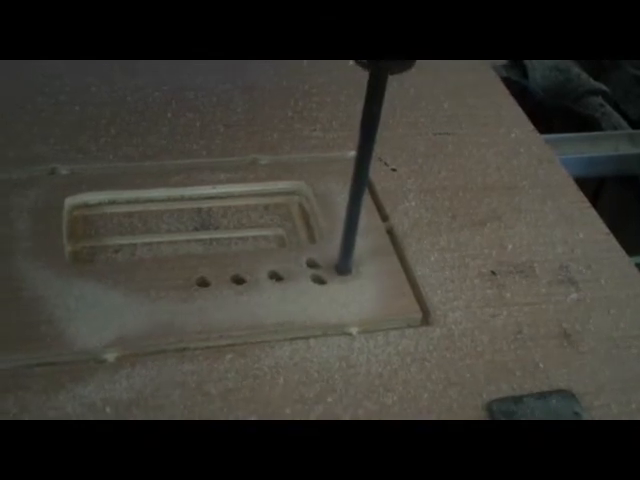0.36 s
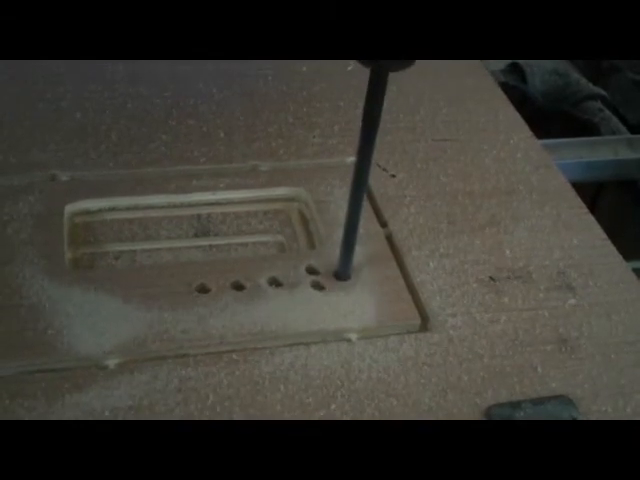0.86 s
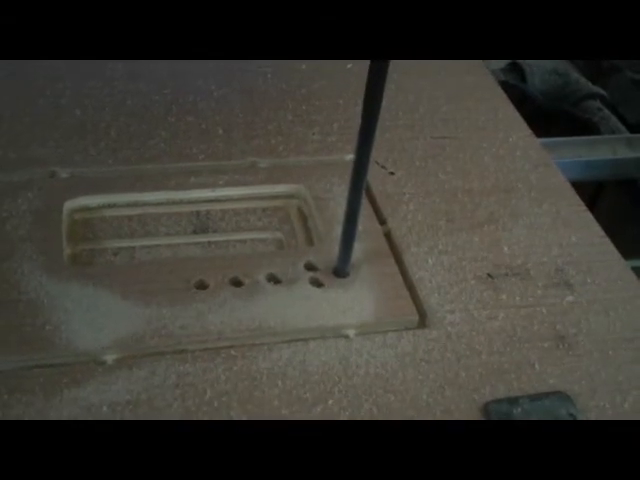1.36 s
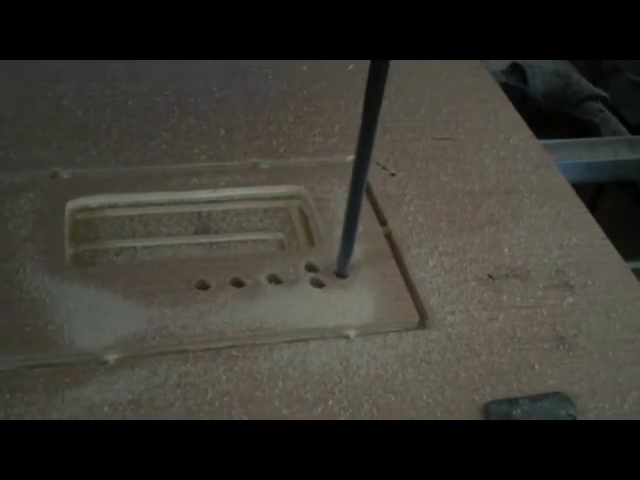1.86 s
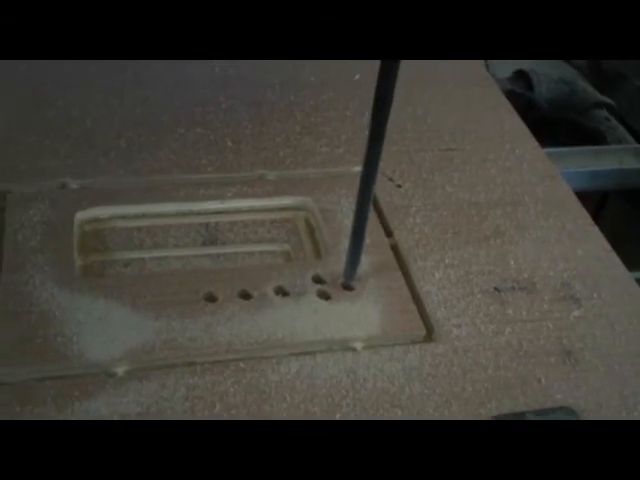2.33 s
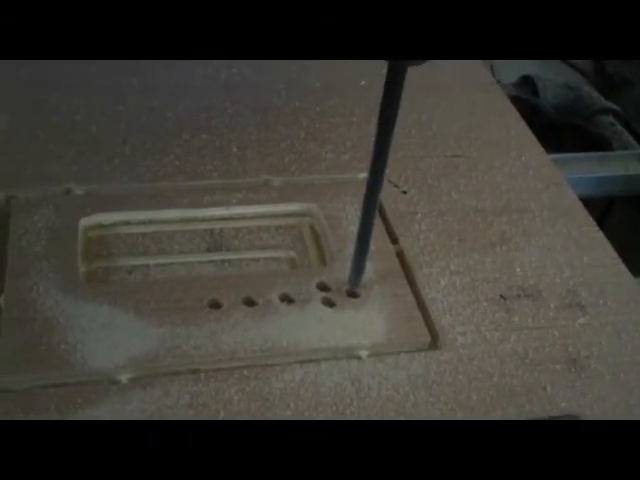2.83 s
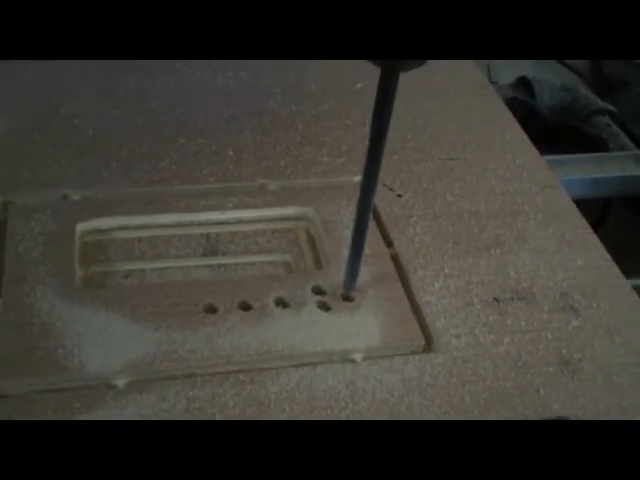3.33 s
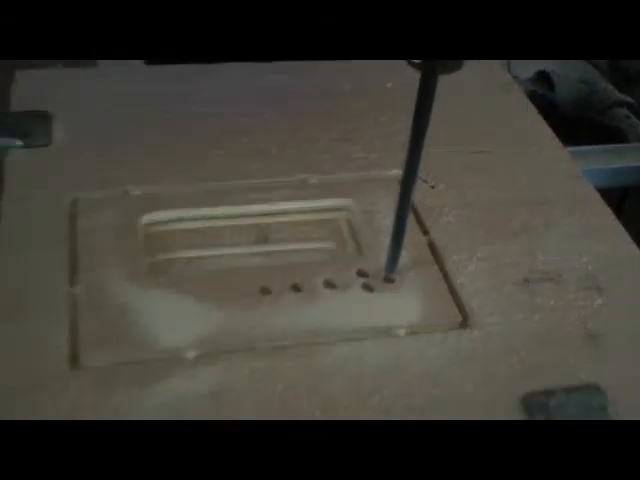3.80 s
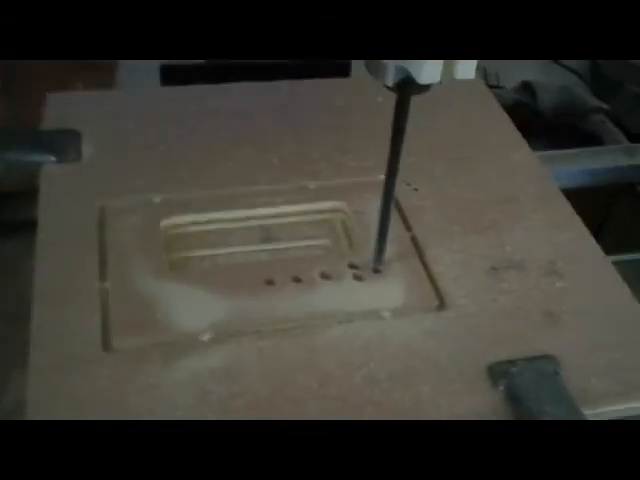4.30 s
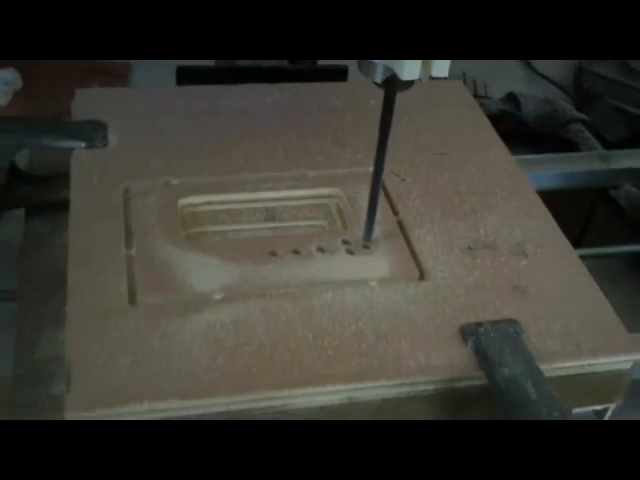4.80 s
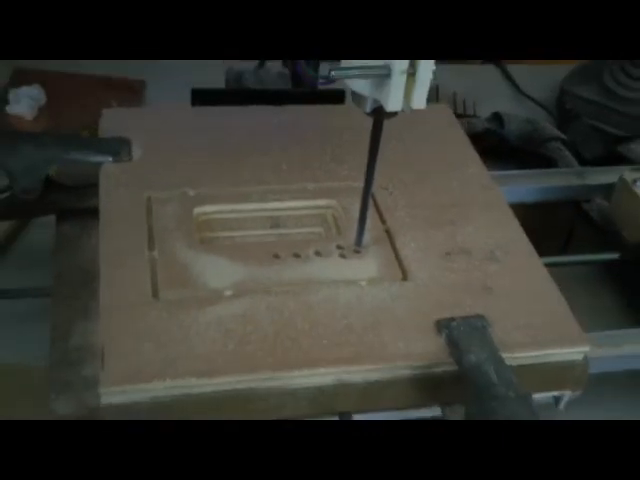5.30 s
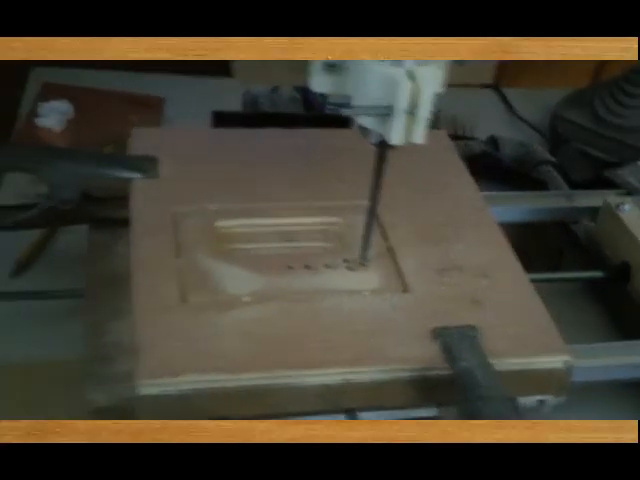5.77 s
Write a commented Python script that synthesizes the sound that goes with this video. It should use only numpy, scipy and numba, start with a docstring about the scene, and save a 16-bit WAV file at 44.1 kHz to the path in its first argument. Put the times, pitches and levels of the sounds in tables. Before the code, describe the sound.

From the start a high-speed milling bit grinds in fibreboard: a harsh, dense buzz around a 225 Hz rotation, with bright tearing chip hiss, a rapid flutter of about sixteen wobbles a second and thumping low frame rumble. It thickens and intensifies until about 0.63 s, when the bit breaks free with a very short woody ring. The level drops to a free-running spindle, airy fan rush with hum and a thin whine near 3 kHz, rising slightly as speed recovers. Small dry metallic knocks patter from 0.73 to 1.08 s over a rough carriage drive buzz, stronger from 1.0, ending at 1.28. From 1.38 to 1.95 s a faint motor tone slides down. The whir slowly comes up in level; around 1.75 s it gains a rougher half-speed buzz. Near 3.8 s the whine swells briefly, and around 4 s the microphone backs away, making it thinner and slightly hollow. It runs steadily to an abrupt silence at 5.58 s.

```python
"""A high-speed bit grinds the end of a plunge into fibreboard, lifts clear and runs free in a workshop.
Cut: partials locked to a wobbling shaft rate, chip noise pulsed by two edges, board modes rung at exit.
Spindle: half-rate whirl partials, bearing whine, fan noise and housing resonances; the microphone backs away.
Carriage: noise bands, damped knocks and a falling motor tone; frame rumble lies under the cut.
Automatic gain ducks under the cut and climbs back slowly; the sound stops abruptly."""
import sys
import numpy as np
from scipy import signal
from scipy.fft import rfft, irfft, next_fast_len
from scipy.io import wavfile
from scipy.ndimage import uniform_filter1d
from numba import njit

SR = 44100
rng = np.random.default_rng(int(sys.argv[2]) if len(sys.argv) > 2 else 0)


def generate_wav(signal):
    """Clip the signal to [-1, 1] and save it as 16-bit WAV at the path in sys.argv[1]."""
    frames = np.transpose(np.atleast_2d(signal))
    scaled = np.clip(frames, -1, 1) * 32767
    pcm = np.round(scaled).astype(np.int16)
    wavfile.write(sys.argv[1], SR, pcm)


def convert_level_to_amplitude(level_db):
    """Map a level in decibels to its linear amplitude factor."""
    exponent = np.asarray(level_db, float) / 20
    return 10 ** exponent


N = 260366
T = np.arange(N) / SR

# All table levels are relative: later gains apply.
# buried-cut partials, shaft-rate multiples from 4 up: [level/dB]
CUT_PARTIALS = [-15, -41.5, -26.5, -39.5, -34.5, -38.5, -35.5, -42, -37.5, -35, -25.5, -42.5, -26, -35.5,
                -32.5, -34, -50.5, -38, -39, -38, -35.5, -37, -30, -41, -30, -37, -32, -38, -39, -49.5, -36]
# shallow-cut colour relative to buried: [f/Hz, level/dB]
SHALLOW_COLOUR = [(900, -2), (1360, 4.5), (2300, 5), (2750, -4), (3650, -8.5), (4100, 1), (5200, 0.5),
                  (5900, -4), (6400, -2.5), (7000, 4.5), (7700, -8)]
# chip noise spectrum: [f/Hz, level/dB]
CHIP_SPECTRUM = [(240, -69.5), (600, -22.5), (900, -22), (1400, -16.5), (2200, -23.5), (3500, -14),
                 (6500, -16.5), (8200, -29), (13000, -40)]
# board modes rung as the bit breaks free: [f/Hz, level/dB, t60/s]
BOARD_MODES = [(856, -12.5, 0.066), (1200, -13.5, 0.054), (3200, -19.5, 0.055), (1698, -24.5, 0.029)]
# multiples of half the shaft rate heard from the spindle: [multiple]
HALF_RATE_MULTIPLES = [*range(1, 12), 23, 24, 25]
# their levels: [near level/dB, far level/dB, share of whirl level]
SPINDLE_PARTIALS = [(-30.5, -30, 0.12), (-14, -14.5, 0.25), (-24, -28.5, 1), (-20.5, -20, -0.32),
                    (-20, -24.5, 0.98), (-8, -9.5, 0.14), (-6, -16.5, .9), (-11.5, -9.5, 0.91),
                    (1, -0.5, 0.84), (-2, -1, 0.11), (-22.5, -24.5, 0.17), (-22.5, -13, 1),
                    (-30.5, -7, 0.088), (-29.5, -14, 0.65)]
# bearing whine, multiples 1 to 3: [near level/dB, far level/dB, share of whirl level]
WHINE_PARTIALS = [(-8.5, -11.5, 0.11), (-6, -6, -0.008), (-13.5, -20.5, 0.38)]
# fan noise spectrum: [f/Hz, level/dB]
FAN_SPECTRUM = [(20, -60), (50, -44.5), (100, -32), (190, -33), (310, -29.5), (520, -19.5), (760, -12.5),
                (1100, -7), (1500, -7.5), (2100, -13.5), (3500, -18), (5650, -16), (6400, -14), (7300, -13),
                (8200, -23.5), (12500, -24)]
# housing resonances: [f/Hz, width/Hz, near level/dB, far level/dB]
HOUSING_MODES = [(831.3, 21, -8.5, -10.5), (1070, 34, -3, -12.5), (1301, 25, -11, -17), (1633, 71, -3.5, 3),
                 (1845, 170, -3, -16), (2274, 118, -7, -14), (2966, 450, -5.5, -15),
                 (4470, 1650, -0.5, -0.5), (7143, 370, -2, -12.5), (8580, 40, -27, -29.5),
                 (11770, 900, -18, -19.5)]
# knocks as the carriage lifts: [t/s, level/dB]
KNOCKS = [(0.7307, -30), (0.745, -21), (0.8047, -25), (0.819, -23), (0.8805, -21.5), (0.8928, -22),
          (0.9617, -22.5), (0.971, -24), (1.0495, -29), (1.0774, -27)]
# metal modes of each knock: [f/Hz, level/dB, t60/s]
KNOCK_MODES = [(3850, -5, .007), (4440, -3, .007), (4990, -2.5, .006), (5660, -6, .006),
               (6400, -3.5, 0.0055), (7030, -1.5, 0.0063), (8700, -9.5, .005), (1110, -7.5, 0.0201)]
# carriage drive bands: [f/Hz, width/Hz, level/dB]
DRIVE_BANDS = [(3075, 60, 2), (940, 25, -6), (1180, 30, -6)]
# frame noise spectrum: [f/Hz, level/dB]
FRAME_SPECTRUM = [(25, -27), (60, -20), (150, -11.5), (230, 1.5), (330, -8), (480, -8), (800, -40)]
# overall response, narrow gaps near 7.9 and 11 kHz, little above 12.5 kHz: [f/Hz, level/dB]
OVERALL_RESPONSE = [(20, -3.5), (7450, 1), (7720, -4.5), (7800, -36), (7960, -38.5), (8040, -7.5),
                    (8300, 1.5), (10500, 1.5), (10900, -3.5), (11000, -19), (11100, -11.5), (11400, -0.5),
                    (12450, 1), (12750, -51.5), (13500, -74)]

# bit in the board: shaft sags, faster just before exit; wobble and load grow with depth
LEAVE_S, LEAVE_T60_S = 0.6264, 0.014
CUT_HZ, SAG_HZ_PER_S, STALL_S, STALL_HZ_PER_S = 227.8, 4.9, 0.585, 85
WOBBLE_RATE_HZ, WOBBLE_PEAK_S = 16.55, 0.276
WOBBLE_START_HZ, WOBBLE_GROWTH_HZ_PER_S = 0.5, 2.1
LOAD_DB_PER_S = 8.5
BURY_S, BURY_SPAN_S = 0.16, 0.021
TOP_MULTIPLES = range(35, 56)  # of the shaft rate
# free spindle: speed recovers, then whirl sets in
FREE_HZ, SLOWED_HZ, RECOVER_S = 241.8, 226.8, 0.75
WHIRL_S, WHIRL_SPAN_S, WHIRL_OFF_DB, WHIRL_ON_DB = 1.75, 0.096, -21.5, 2
BACK_S, BACK_SPAN_S = 3.95, 0.24  # microphone backs away
ECHO_S, ECHO_GAIN = 0.000692, 0.13
# bearing whine: slower recovery, shiver while the carriage travels, brief swell as the microphone moves
WHINE_HZ, WHINE_SLOWED_HZ, WHINE_RECOVER_S = 3107, 2972, 0.9
SHIVER_DEPTH_HZ, SHIVER_RATE_HZ, SHIVER_PEAK_S, SHIVER_END_S = 22, 14.6, 1.455, 1.68
SWELL_S, SWELL_SPAN_S, SWELL_DB = 3.8, 0.25, 3
# carriage drive: steady, louder surge, off
LIFT_DB, SURGE_S, SURGE_DB, LIFT_END_S, LIFT_EDGE_S = -51.5, 1.01, 7, 1.28, 0.0093
# feed motor: even braking, easing into a crawl; FEED_DB holds at half of BRAKE_HZ
BRAKE_S, BRAKE_HZ, BRAKE_HZ_PER_S, CRAWL_HZ, EASE_HZ, HALT_S = 1.38, 1960, 3330, 200, 150, 1.95
FEED_DB, FEED_DB_PER_OCTAVE, FEED_FADE_S = -53, 6, 0.015
STOP_S = 5.5847


def level(x, db):
    """Scale to an rms level."""
    return x * convert_level_to_amplitude(db) / np.sqrt(np.mean(x ** 2))


def colour(x, points):
    """Filter by (f/Hz, level/dB) points on a log-frequency axis."""
    size = next_fast_len(N)
    hz, db = np.transpose(points)
    bins_hz = np.fft.rfftfreq(size, 1 / SR)
    gain = convert_level_to_amplitude(np.interp(np.log(bins_hz + 1), np.log(hz), db))
    return irfft(rfft(x, size) * gain, size)[:N]


def resonance(x, hz, width_hz):
    """Two-pole band-pass."""
    return signal.lfilter(*signal.iirpeak(hz, hz / width_hz, SR), x)


def walk(rate_hz, size=N):
    """Smooth random drift, about rate_hz turns a second, rms 1."""
    knots = rng.standard_normal(int(size / SR * rate_hz) + 3)
    line = np.interp(T[:size] * rate_hz, np.arange(len(knots)), knots)
    return level(uniform_filter1d(line, int(SR / rate_hz / 2)), 0)


def step(s, span_s):
    """Smooth rise from 0 to 1 around a moment."""
    return 0.5 + 0.5 * np.tanh((T - s) / span_s / 2)


def recover(low_hz, top_hz, lag_s):
    """Exponential speed recovery once the bit is free."""
    return top_hz - (top_hz - low_hz) * np.exp(-np.maximum(T - LEAVE_S, 0) / lag_s)


def stack(hz, orders, waver_db, waver_hz, slip_rad):
    """Partials locked to one rotation, each wavering in level and slipping in phase."""
    turn = 2 * np.pi * np.cumsum(hz) / SR
    total = np.zeros(len(hz))
    for k, db in orders:
        gain = convert_level_to_amplitude(db + waver_db * walk(waver_hz, len(hz)))
        slip = slip_rad * walk(waver_hz, len(hz))
        total += gain * np.sin(k * turn + slip + 2 * np.pi * rng.random())
    return total * np.sqrt(2), turn


def rumble():
    """Frame shakes in uneven thumps, harder as the bit goes deeper."""
    noise = level(colour(rng.standard_normal(N), FRAME_SPECTRUM), -65)
    shake_db = 4.5 * walk(25) + 6 * np.minimum(T, LEAVE_S)
    return noise * convert_level_to_amplitude(shake_db) * (1 - step(LEAVE_S, 0.01))


def feed():
    """Axis motor braking: a rough tone whose pitch and level fall with speed."""
    braking_hz = BRAKE_HZ - CRAWL_HZ - BRAKE_HZ_PER_S * (T - BRAKE_S)
    hz = CRAWL_HZ + EASE_HZ * np.logaddexp(0, braking_hz / EASE_HZ)
    heard = step(BRAKE_S, FEED_FADE_S) - step(HALT_S, FEED_FADE_S)
    db = FEED_DB + FEED_DB_PER_OCTAVE * np.log2(hz / BRAKE_HZ * 2)
    return heard * stack(hz, [(1, db)], waver_db=3.5, waver_hz=35, slip_rad=0.6)[0]


def lift():
    """Carriage drive sings in narrow, rough noise bands."""
    running = step(LEAVE_S, LIFT_EDGE_S) - step(LIFT_END_S, LIFT_EDGE_S)
    bands = sum(level(resonance(rng.standard_normal(N), f, width), db) for f, width, db in DRIVE_BANDS)
    return running * convert_level_to_amplitude(LIFT_DB + SURGE_DB * step(SURGE_S, LIFT_EDGE_S)) * bands


def rattles():
    """Short knocks ring damped metal modes, detuned anew each time."""
    out, t = np.zeros(N), T[:SR // 25]
    for s, db in KNOCKS:
        ring = np.zeros(len(t))
        for f, mode_db, t60 in KNOCK_MODES:
            mode_hz = f * (1 + 0.11 * (rng.random() - 0.5))
            phase = 2 * np.pi * rng.random()
            ring += convert_level_to_amplitude(mode_db - 60 * t / t60) * np.sin(2 * np.pi * mode_hz * t + phase)
        start = int(s * SR)
        attack = np.minimum(t / 0.001, 1)
        out[start:start + len(t)] += convert_level_to_amplitude(db) * attack * ring / np.abs(ring).max()
    return colour(out, [(300, -42), (900, 9.0)])


def balance(multiples, partials, far):
    """Partial levels shifting with distance and with the onset of whirl."""
    whirl_db = WHIRL_OFF_DB + (WHIRL_ON_DB - WHIRL_OFF_DB) * step(WHIRL_S, WHIRL_SPAN_S)
    return [(k, near + far * (away - near) + share * whirl_db)
            for k, (near, away, share) in zip(multiples, partials)]


def fan(hz, far):
    """Turbulent fan air and the housing resonances it excites share the same gusts."""
    gust_db = 0.68 * walk(24.016)
    air = level(colour(rng.standard_normal(N), FAN_SPECTRUM), 6.94) * convert_level_to_amplitude(gust_db + 0.28 * walk(45))
    housing = np.zeros(N)
    for f, width, near, away in HOUSING_MODES:
        mode = resonance(resonance(rng.standard_normal(N), f, width), f, 2 * width)
        housing += level(mode, 1.93) * convert_level_to_amplitude(near + far * (away - near) + gust_db + 1.05 * walk(11))
    # the unbalanced shaft throbs the air at half rate
    throb = 1 + 0.063 * np.cos(np.pi * np.cumsum(hz) / SR)
    # treble flickers on its own
    treble = colour(air, [(4000, -32.5), (8000, -4.5)])
    blown = throb * (air + housing + treble * (convert_level_to_amplitude(2.0 * walk(18)) - 1))
    # from further back, a bounce off the board combs the noise
    return blown + ECHO_GAIN * far * np.roll(blown, round(ECHO_S * SR))


def whine(far):
    """Bearing tone and overtones, shivering with carriage travel."""
    shiver = np.cos(2 * np.pi * SHIVER_RATE_HZ * (T - SHIVER_PEAK_S)) * (1 - step(SHIVER_END_S, 0.03))
    hz = recover(WHINE_SLOWED_HZ, WHINE_HZ, WHINE_RECOVER_S) + SHIVER_DEPTH_HZ * shiver
    hz = hz * (1 + 0.002 * walk(22))
    swell = convert_level_to_amplitude(SWELL_DB * np.exp(-((T - SWELL_S) / SWELL_SPAN_S) ** 2))
    orders = balance([1, 2, 3], WHINE_PARTIALS, far)
    return swell * stack(hz, orders, waver_db=1.8, waver_hz=35, slip_rad=0.3)[0]


def spindle():
    """Shaft and whirl partials of half the shaft rate, with whine and fan."""
    hz = recover(SLOWED_HZ, FREE_HZ, RECOVER_S) + 0.2426 * walk(1.5)
    far = step(BACK_S, BACK_SPAN_S)
    orders = balance(HALF_RATE_MULTIPLES, SPINDLE_PARTIALS, far)
    hum = stack(hz / 2, orders[:4], waver_db=0.7, waver_hz=16, slip_rad=0.15)[0]
    tones = stack(hz / 2, orders[4:], waver_db=3.0, waver_hz=30, slip_rad=0.28)[0]
    return convert_level_to_amplitude(-46.5) * (hum + tones + whine(far) + fan(hz, far))


def cut():
    """Edges strike the board each turn; torn chips hiss with each edge; the board rings as the bit leaves."""
    t = T[:SR]
    deep_s, after_s = np.minimum(t, LEAVE_S), np.maximum(t - LEAVE_S, 0)
    # uneven feed slows the shaft in a steady rhythm
    beat = np.cos(2 * np.pi * WOBBLE_RATE_HZ * (t - WOBBLE_PEAK_S))
    hz = CUT_HZ - SAG_HZ_PER_S * deep_s - STALL_HZ_PER_S * np.maximum(deep_s - STALL_S, 0)
    hz = hz + (WOBBLE_START_HZ + WOBBLE_GROWTH_HZ_PER_S * deep_s) * beat + 0.2 * walk(60, SR)

    shallow = 1 - step(BURY_S, BURY_SPAN_S)[:SR]
    shallow_hz, shallow_db = np.transpose(SHALLOW_COLOUR)
    orders = [(k, db + shallow * np.interp(np.log(k * CUT_HZ), np.log(shallow_hz), shallow_db))
              for k, db in enumerate(CUT_PARTIALS, start=4)]
    top = [(k, -50 - 0.31 * (k - TOP_MULTIPLES[0]) - 4 * shallow) for k in TOP_MULTIPLES]
    edges = stack(hz, orders[:3], waver_db=-1.5, waver_hz=27, slip_rad=0.081)[0]
    # upper partials swell and sink as the contact shifts
    drifting = [(k, db + 2.6 * walk(11, SR)) for k, db in orders[3:] + top]
    song, turn = stack(hz, drifting, waver_db=1.8, waver_hz=40, slip_rad=0.3)

    hiss = colour(rng.standard_normal(N), CHIP_SPECTRUM)[:SR]
    chips = level(hiss * (1 + 1.9 * np.cos(2 * turn)), -29)  # two edges a turn
    load_db = LOAD_DB_PER_S * deep_s + 0.6 * beat - 60 * after_s / LEAVE_T60_S
    bit = convert_level_to_amplitude(load_db) * (edges + song + chips)
    ring = sum(convert_level_to_amplitude(db - 60 * after_s / t60) * np.sin(2 * np.pi * f * after_s) for f, db, t60 in BOARD_MODES)
    # the clamped board radiates little bass
    return colour(np.pad(bit + ring, (0, N - SR)), [(250, -45), (520, -17.0), (720, -1.0)])


def scene():
    """All sources at the microphone."""
    return (rumble() + feed() + lift() + rattles() + spindle() + cut())[None]


@njit
def ride_gain(x, smooth, top_db, fall, rise_db, start_db):
    """Gain falls in proportion while the output is over the top level, else climbs at a steady rate."""
    y, power, db = np.empty(len(x)), 10 ** (top_db / 10), start_db
    for i in range(len(x)):
        y[i] = x[i] * 10 ** (db / 20)
        power += smooth * (y[i] ** 2 - power)
        over_db = 10 * np.log10(power + 1e-18) - top_db
        db += -fall * over_db if over_db > 0 else rise_db
    return y


def band_limit(x):
    """A steep low-pass at the top of the band."""
    return signal.sosfilt(signal.butter(12, 13800, fs=SR, output="sos"), x)


def record(dry):
    """Overall response, automatic gain and a hard stop into silence."""
    heard = colour(dry[0], OVERALL_RESPONSE)
    # 10 ms power smoothing; falls 2.5 dB/s per dB over, climbs 16.5 dB/s
    ridden = ride_gain(heard, 1 / (0.01 * SR), -16.0, 2.5 / SR, 16.5 / SR, 0.85)
    mix = (ridden * np.clip((STOP_S - T) / 0.00048, 0, 1))[None]
    return band_limit(mix)


dry = scene()
out = record(dry)
generate_wav(out)
```